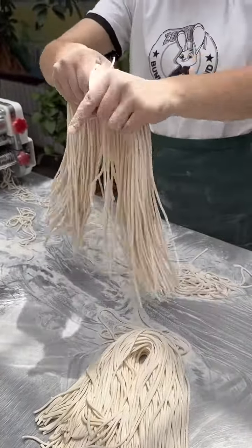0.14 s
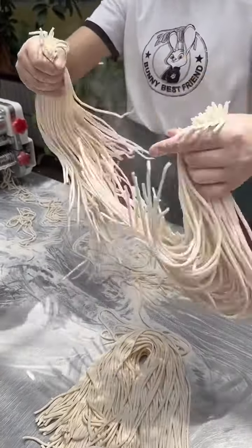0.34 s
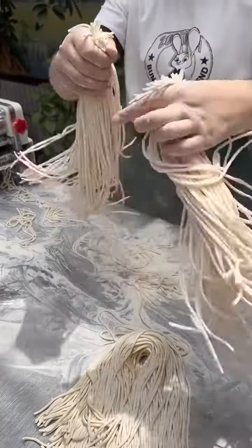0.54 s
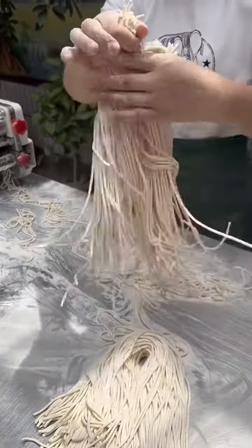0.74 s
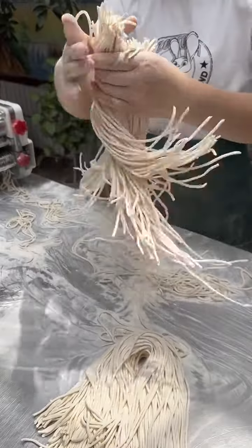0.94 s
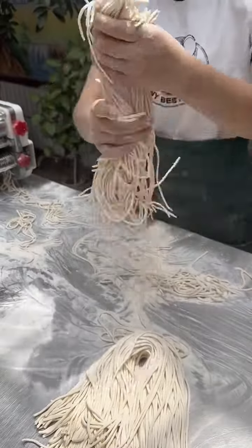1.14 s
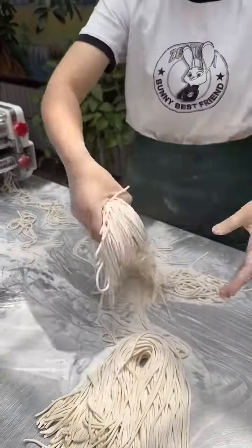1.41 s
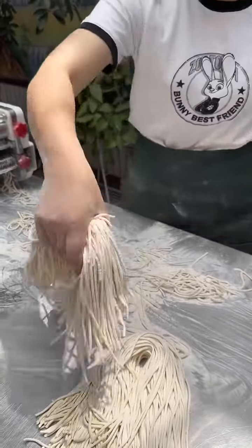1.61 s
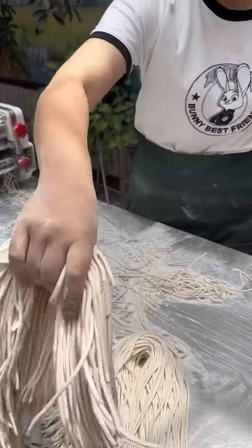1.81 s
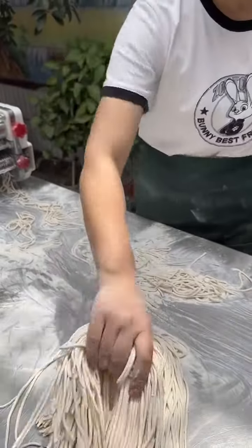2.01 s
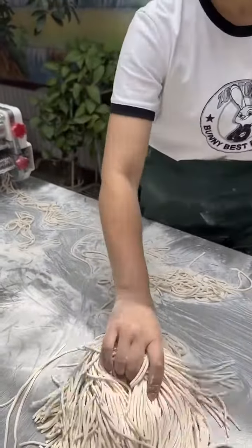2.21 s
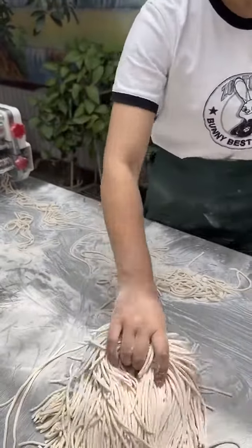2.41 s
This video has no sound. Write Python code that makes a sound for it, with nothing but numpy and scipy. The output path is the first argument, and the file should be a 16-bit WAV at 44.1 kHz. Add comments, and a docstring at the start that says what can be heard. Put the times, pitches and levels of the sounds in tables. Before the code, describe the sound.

Fresh noodle bundle slapped heavily, very close: a faint rustle and swish with a puff of air, then at 0.2 s a deep, clipped boom with sharp strand smacks, dying quickly. Near-quiet with faint rustling and hum until a soft air puff at 1.25 s and a light hollow pat with patter at 1.35 s. At 2.1 s a firmer hollow splat on the metal worktop, crackling strands, a small hard tick at 2.2 s. Short kitchen reflections.

```python
"""In a small kitchen, bundles of fresh noodles are swung and dropped on a floured steel worktop, close up.
One heavy slap overloads the microphone: a sagging sine boom with ringing modes, low noise and grainy smacks.
Two softer landings are clusters of hollow decaying tones with splats, and grains pattering after them.
Strands swish, rustle and crackle as coloured grains, a small hard tick rings, and low noise puffs like pushed air.
Behind them lie short band-by-band reflections, faint mains hum made of sines, and room air made of noise."""
import sys
import numpy as np
from scipy import signal
from scipy.fft import rfft, irfft
from scipy.io import wavfile
from scipy.ndimage import uniform_filter1d

SR = 44100
rng = np.random.default_rng(int(sys.argv[2]) if len(sys.argv) > 2 else 0)


def generate_wav(signal):
    """Clip the signal to [-1, 1] and save it as 16-bit WAV at the path in sys.argv[1]."""
    frames = np.transpose(np.atleast_2d(signal))
    scaled = np.clip(frames, -1, 1) * 32767
    pcm = np.round(scaled).astype(np.int16)
    wavfile.write(sys.argv[1], SR, pcm)


N = 114660  # length in samples, 2.6 s


def undb(db):
    """Decibels to gain."""
    return 10 ** (np.asarray(db) / 20)


def colour(x, points, size=8192):
    """Shape white sound by (Hz, dB) points with a causal, minimum-phase filter that keeps its power."""
    hz, db = np.array(points, float).T
    bins_hz = np.fft.rfftfreq(size, 1 / SR)
    gain = undb(np.interp(np.log(bins_hz + 1), np.log(hz), db))
    gain = gain / np.sqrt(np.mean(gain ** 2))
    # folding the cepstrum forward in time makes the filter causal
    cepstrum = irfft(np.log(gain))
    cepstrum[1:size // 2] *= 2
    cepstrum[size // 2 + 1:] = 0
    impulse = irfft(np.exp(rfft(cepstrum)))
    return signal.oaconvolve(x, impulse)[:N]


def envelope(start, attack, hold, t60):
    """Smooth rise, hold and exponential release, all in seconds."""
    t = np.arange(N) / SR - start
    rise = np.sin(np.pi / 2 * np.clip(t / attack, 0, 1)) ** 2
    release = np.exp(-np.log(1000) * np.maximum(t - attack - hold, 0) / t60)
    return rise * release


def bursts(rows):
    """Joint level of (start, attack, hold, t60, dB) events, added as powers."""
    return np.sqrt(sum((undb(db) * envelope(*shape)) ** 2 for *shape, db in rows))


def ring(start, modes):
    """Sine modes (Hz, dB, swell s, t60 s) that swell while the contact lasts, then die away."""
    t = np.arange(N) / SR - start
    return sum(undb(db) * envelope(start, swell, 0, t60) * np.sin(2 * np.pi * hz * t)
               for hz, db, swell, t60 in modes)


GRAINS_PER_S, GRAIN_SCATTER_DB = 1500, 1.5
GRAIN_SMOOTH = 0.84  # level of the smooth rub against the clicks


def grains():
    """Countless tiny contacts of uneven size over a smooth rub, at unit power."""
    hits = rng.random(N) < GRAINS_PER_S / SR
    sizes = undb(GRAIN_SCATTER_DB * rng.standard_normal(N))
    clicks = hits * rng.choice([-1, 1], N) * sizes
    x = clicks / clicks.std() + GRAIN_SMOOTH * rng.standard_normal(N)
    return x / x.std()


def rumble(points, size):
    """Low noise whose strength is even over spans of `size` samples."""
    x = colour(rng.standard_normal(N), points)
    return x / np.sqrt(uniform_filter1d(x ** 2, size))


BOOM_S, BOOM_HZ = .2135, 42.54  # start, and the pitch it settles at
BOOM_SAG_HZ, BOOM_SAG_S = 27.9, 0.008  # extra pitch at the start, and its decay time constant
# The boom's blow and lingering tail. Each row: attack in seconds, hold in seconds, t60 in seconds, level in dB.
BOOM_SHAPE = [(0.015, 0.0063, .115, 1.5), (0.032, .01, 0.34, -32)]
# Higher modes of the same blow. Each row: pitch in Hz, level in dB, swell in seconds, t60 in seconds.
THUD_MODES = [(71.67, -12.5, 0.015, 0.048), (124, -5.5, 0.0196, 0.064), (157, -21, 0.028, 0.079),
              (243.2, -32.5, .01, 0.24), (307.7, -35.5, .01, .22), (423.3, -25.5, .008, 0.1)]


def boom():
    """The heavy slap's deep tone, starting high and sagging as the push relaxes, with its higher modes."""
    t = np.maximum(np.arange(N) / SR - BOOM_S, 0)
    turns = BOOM_HZ * t + BOOM_SAG_HZ * BOOM_SAG_S * (1 - np.exp(-t / BOOM_SAG_S))
    level = bursts([(BOOM_S, *row) for row in BOOM_SHAPE])
    return level * np.sin(2 * np.pi * turns) + ring(BOOM_S, THUD_MODES)


# Dull body of the slap and its fading rumble.
# Each row: start in seconds, attack in seconds, hold in seconds, t60 in seconds, level in dB.
FLOPS = [(.21, .005, 0.04, 0.0989, -20), (.27, 0.023, .01, 0.75, -55)]
# Spectrum of the flop. Each row: frequency in Hz, level in dB.
FLOP_COLOUR = [(30, -2.5), (90, 6), (150, -1), (200, -8.5), (300, -6.5), (440, -7.5), (600, -14.5),
               (1200, -24.5), (2500, -43.5), (9000, -85.5)]


def flop():
    """The slap's soft body: low noise of even strength under a short burst and a long fade."""
    return bursts(FLOPS) * rumble(FLOP_COLOUR, size=700)


# Sharp smacks of strands within the slap. Each row: start in seconds, attack in seconds,
# hold in seconds, t60 in seconds, level in dB, hiss in dB.
SMACKS = [(0.2116, .0015, 0.0016, 0.031, -17.5, -61), (0.227, 0.0058, .02, 0.12, -40.5, -56),
          (0.2362, .001, 0.0044, .022, -25.5, -42.5), (0.25, .0006, .0005, .02, -37.5, -67),
          (0.258, .0006, .0005, 0.037, -44, -71.5)]
# Spectra of the smacks, and of the fine hiss shared with the swishes. Each row: frequency in Hz, level in dB.
SMACK_COLOUR = [(150, 15), (500, 1.5), (1400, 1), (2600, -4.5), (4200, -10.5), (5500, -23.5), (7000, -21),
                (8200, -22), (9600, -48)]
HISS_COLOUR = [(1000, -27), (3500, 2), (5000, 3.5), (6400, 3.5), (7300, -15.5), (9000, -26), (10000, -38.5)]


def smacks():
    """Strands hit as short bursts of grains, with a finer hiss on top."""
    smack = bursts([(*shape, db) for *shape, db, _ in SMACKS])
    hiss = bursts([(*shape, db) for *shape, _, db in SMACKS])
    return colour(smack * grains(), SMACK_COLOUR) + colour(hiss * grains(), HISS_COLOUR)


def slap():
    """The heavy bundle: flop and smacks around a boom of inverted polarity."""
    return flop() - boom() + smacks()


# Hollow pats on the worktop.
# Each row: start in seconds, pitch in Hz, ring in dB, t60 of the ring in seconds, splat in dB.
PATS = [(.026, 1060, -37, 0.025, -68), (.026, 2580, -45.5, 0.13, -69), (1.3385, 910, -28.5, 0.022, -46),
        (1.3365, 2780, -38, 0.021, -48), (1.366, 915, -31.5, 0.11, -44), (1.398, 950, -44, 0.015, -56.5),
        (1.423, 1000, -42, .03, -50.5), (1.439, 980, -43, .04, -57), (2.0701, 892, -26, 0.024, -48),
        (2.084, 896, -23.5, 0.024, -49.5), (2.091, 892, -13.5, 0.018, -28), (2.1, 972, -18.5, .025, -42.5)]
PAT_SWELL_S, SPLAT_T60_S = .0035, .05
# Spectrum of the splats. Each row: frequency in Hz, level in dB.
SPLAT_COLOUR = [(80, -13), (400, -1), (600, 1.5), (1000, 2), (1600, 1.5), (2100, 0), (2950, -0.5),
                (3700, -12.5), (5100, -21.5), (5800, -42), (7200, -46.5), (9000, -73.5)]


def pats():
    """Clumps land with a short hollow ring and a grainy splat."""
    rings = sum(ring(start, [(hz, db, PAT_SWELL_S, t60)]) for start, hz, db, t60, _ in PATS)
    splat = bursts([(start, PAT_SWELL_S, 0, SPLAT_T60_S, db) for start, _, _, _, db in PATS])
    return rings + colour(splat * grains(), SPLAT_COLOUR)


# Loose strands pattering down. Each row: start in seconds, attack in seconds, hold in seconds,
# t60 in seconds, hollow pitch in Hz, hollow in dB, crackle in dB.
PATTER = [(0.005, 0.023, .01, 0.39, 988, -46.5, -77), (1.329, 0.012, 0.0093, 0.046, 1100, -42, -43.5),
          (1.344, 0.019, 0.068, 0.32, 960, -41.5, -48.5), (1.914, .012, 0.022, 0.63, 1000, -67, -66.5),
          (1.954, 0.035, .01, .25, 957, -62.5, -64), (2.066, .006, 0.049, 0.23, 880, -40, -46.5),
          (2.165, .007, .015, 0.31, 854, -55.5, -57.5)]
# Resonances of the hollow under a bundle. Each row: multiple of its pitch, level in dB.
HOLLOW = [(.05, -27.5), (.3, -17), (.6, -22), (.82, -5), (1, 4), (1.2, -6.5), (1.7, -25.5), (2.2, -21),
          (2.55, -12.5), (3, -15.5), (4, -26.5), (7, -65.5)]
# Spectrum of the patter's crackle. Each row: frequency in Hz, level in dB.
PATTER_COLOUR = [(60, -1), (250, -7), (550, -1), (850, 4), (1300, 11), (1850, -1), (2700, 1.5), (3300, -2),
                 (4000, -15), (5100, -17.5), (6000, -52), (7000, -51), (9000, -58)]


def patter():
    """Strands fall as grains, heard through the pitched hollow under a bundle and as open crackle."""
    hollow = 0
    for *shape, hz, db, _ in PATTER:
        resonances = [(hz * multiple, gain) for multiple, gain in HOLLOW]
        hollow = hollow + colour(undb(db) * envelope(*shape) * grains(), resonances)
    crackle = bursts([(*shape, db) for *shape, _, _, db in PATTER])
    return hollow + colour(crackle * grains(), PATTER_COLOUR)


# Crisp crackle of floury strands as the last bundle spreads.
# Each row: start in seconds, attack in seconds, hold in seconds, t60 in seconds, level in dB.
CRACKLES = [(2.071, .002, 0.005, 0.055, -47), (2.0905, 0.0031, 0.0034, 0.061, -36),
            (2.112, 0.0086, 0.0057, 0.061, -44)]
# Spectrum of the crackle. Each row: frequency in Hz, level in dB.
CRACKLE_COLOUR = [(300, -7.5), (1500, -4.5), (2100, 2), (3000, -1), (4100, -2), (5150, -9.5), (5600, -35),
                  (7000, -44), (9000, -55)]


def crackles():
    """Floury strands part in short bursts of bright grains."""
    return colour(bursts(CRACKLES) * grains(), CRACKLE_COLOUR)


# Strands sliding over each other. Each row: start in seconds, attack in seconds, hold in seconds,
# t60 in seconds, level in dB, hiss in dB.
SWISHES = [(0.051, 0.024, 0.0057, 1, -68, -62), (0.165, 0.012, 0.0031, 0.13, -38, -46),
           (0.365, 0.041, .008, 0.1, -69.5, -69), (0.46, 0.018, 0.014, 0.45, -56, -77),
           (2.125, 0.025, 0.031, 0.72, -54, -87)]
# Spectrum of the swishes. Each row: frequency in Hz, level in dB.
SWISH_COLOUR = [(100, -17), (600, -1), (1000, -3), (1700, -8), (2400, 3), (3600, 1), (4600, -6.5),
                (6000, -20), (7500, -43.5), (9500, -67)]


def swishes():
    """Strands rub together as swelling grains, with a finer floury hiss on top."""
    rub = bursts([(*shape, db) for *shape, db, _ in SWISHES])
    hiss = bursts([(*shape, db) for *shape, _, db in SWISHES])
    return colour(rub * grains(), SWISH_COLOUR) + colour(hiss * grains(), HISS_COLOUR)


# Quiet handling of the dough.
# Each row: start in seconds, attack in seconds, hold in seconds, t60 in seconds, level in dB.
HANDLING = [(.03, .025, 0.073, 0.88, -52.5), (.38, 0.011, 0.13, 0.23, -67.5),
            (1.35, 0.019, 0.12, 0.85, -61.5), (1.55, 0.055, 0.31, 0.22, -70.5),
            (1.91, 0.035, 0.14, .2, -65), (2.12, 0.039, 0.079, 0.41, -56), (2.25, 0.065, .1, 7.5, -65)]
# Spectrum of the handling. Each row: frequency in Hz, level in dB.
HANDLING_COLOUR = [(30, -4), (115, 1), (280, -2), (500, -5), (850, -2.5), (1500, -12), (2500, -8),
                   (4000, -14), (6000, -27.5), (7300, -47.5), (9000, -66.5)]


def handling():
    """Dough in the hands makes a soft rustle of darker grains."""
    return colour(bursts(HANDLING) * grains(), HANDLING_COLOUR)


TICK_S = 2.1977
# Modes of the tick. Each row: pitch in Hz, level in dB, swell in seconds, t60 in seconds.
TICK_MODES = [(3860, -31, 0.0034, 0.0067), (2460, -34, 0.002, 0.014), (3320, -33, .0015, .01),
              (4340, -36.5, 0.00048, 0.0097), (5600, -44.5, .001, .006), (6240, -50, 0.0011, 0.003),
              (900, -37.5, .001, .015)]


def tick():
    """One small hard tick: bright modes that die within milliseconds."""
    return ring(TICK_S, TICK_MODES)


# Air pushed at the microphone.
# Each row: start in seconds, attack in seconds, hold in seconds, t60 in seconds, level in dB.
GUSTS = [(.022, .035, 0.024, 0.19, -36.5), (.168, 0.029, 0.01249, 0.06, -28.5),
         (1.238, 0.048, 0.044, .3, -44)]
# Spectrum of the gusts. Each row: frequency in Hz, level in dB.
GUST_COLOUR = [(12, -5), (28, -3), (50, -4.5), (85, -13), (150, -26.5), (300, -36), (1000, -75.5),
               (4000, -100)]


def gusts():
    """Moving strands push air at the microphone, heard as puffs of very low noise."""
    return bursts(GUSTS) * rumble(GUST_COLOUR, size=2000)


ROOM_ONSET_S = 0.004
# Kitchen reverberation. Each row: low edge in Hz, high edge in Hz, t60 in seconds, level in dB.
ROOM = [(130, 563, 0.2, -19.5), (600, 1800, 0.15, -20.5), (1800, 2300, 0.39, -20)]


def kitchen(x):
    """Diffuse reflections as decaying noise, each band with its own decay."""
    response = 0
    for low, high, t60, db in ROOM:
        bandpass = signal.butter(3, [low, high], "band", fs=SR, output="sos")
        band = signal.sosfilt(bandpass, rng.standard_normal(N))
        tail = band * envelope(0, ROOM_ONSET_S, 0, t60)
        # energy in proportion to bandwidth, so the level holds within the band
        energy = 2 * (high - low) / SR
        response = response + tail * undb(db) * np.sqrt(energy / np.sum(tail ** 2))
    return signal.fftconvolve(x, response)[:N]


MAINS_HZ = 50
# Mains hum. Each row: multiple of the mains frequency, RMS level in dB.
HUM = [(1, -78), (3, -85), (5, -75), (6, -80.5), (9, -82), (12, -88.5), (14, -83), (16, -87.5), (18, -95),
       (20, -85), (24, -95), (25, -85)]


def mains_hum():
    """Steady sines at multiples of the mains frequency, each at a random phase."""
    t = np.arange(N) / SR
    return sum(np.sqrt(2) * undb(db) * np.sin(2 * np.pi * (multiple * MAINS_HZ * t + rng.random()))
               for multiple, db in HUM)


AIR_DB, AIR_SIDE_DB = -71.5, -90  # RMS levels in the middle and at the sides
# Spectrum of the room air. Each row: frequency in Hz, level in dB.
AIR_COLOUR = [(20, -6), (50, -6), (120, 3), (300, -9), (500, -4.5), (1000, -8.5), (2000, -8), (3800, -14),
              (5500, -21.5), (6600, -30.5), (8000, -43), (15000, -57)]


def room_air(db):
    """Still room air: steady coloured noise."""
    return undb(db) * colour(rng.standard_normal(N), AIR_COLOUR)


SIDE_DB = -26  # reflections at the sides, against those in the middle
PORT_LAG_S = 4e-6  # sound reaches the left port this much before the right one


def scene():
    """Everything is central; port lag, reflections and air differ slightly between left and right."""
    landings = pats() + patter()
    strands = swishes() + handling() + crackles()
    direct = slap() + landings + strands + tick()
    mid = direct + kitchen(direct) + gusts() + mains_hum() + room_air(AIR_DB)
    side = undb(SIDE_DB) * kitchen(direct) + room_air(AIR_SIDE_DB)
    # adding the slope advances the left, subtracting it delays the right
    side = side + np.gradient(mid) * SR * PORT_LAG_S / 2
    return np.array([mid + side, mid - side])


OFFSET, TOP_HZ = .0012, 9600  # steady offset as a part of full scale, and the treble limit


def record(dry):
    """The recorder adds a tiny steady offset, clips the boom at full scale and cuts the top."""
    clipped = np.clip(dry + OFFSET, -1, 1)
    # order 8, 0.2 dB ripple, 70 dB down beyond the cut
    lowpass = signal.ellip(8, .2, 70, TOP_HZ, fs=SR, output="sos")
    return signal.sosfilt(lowpass, clipped)


dry = scene()
out = record(dry)
generate_wav(out)
```